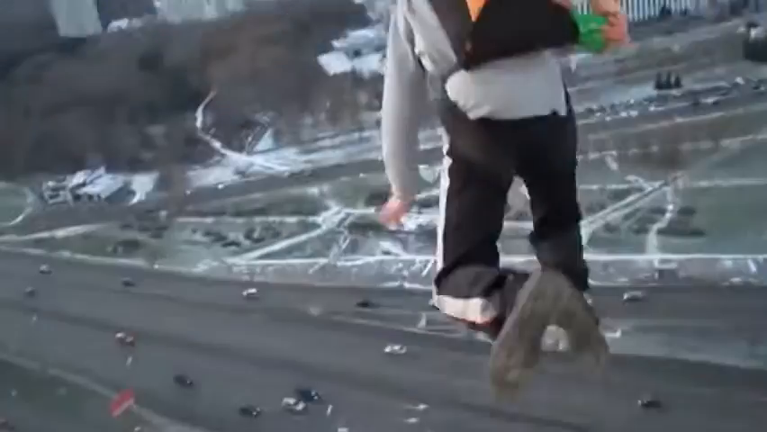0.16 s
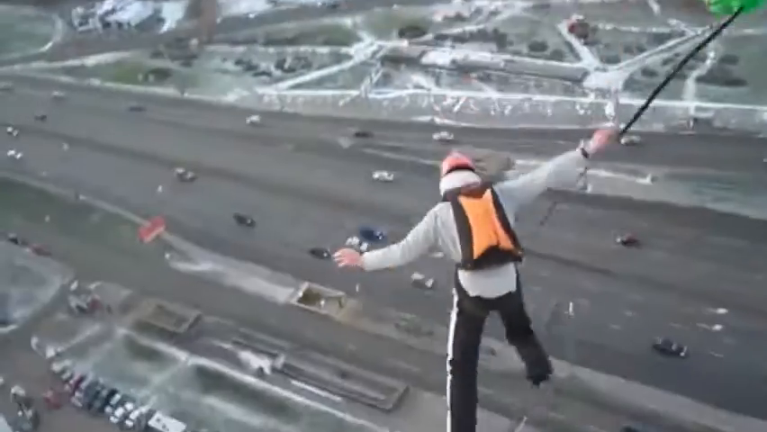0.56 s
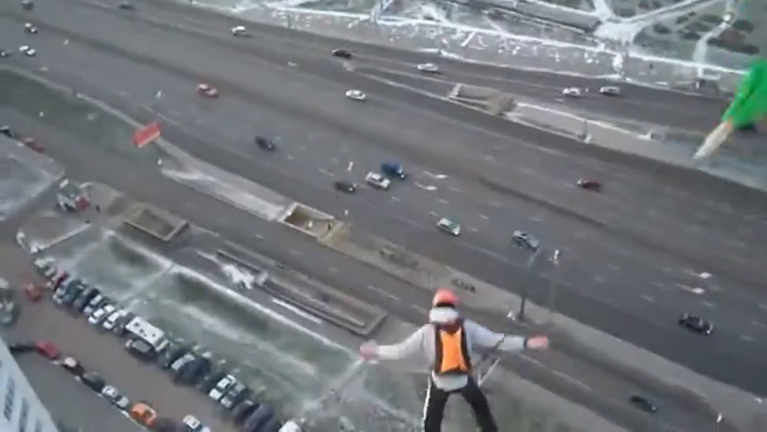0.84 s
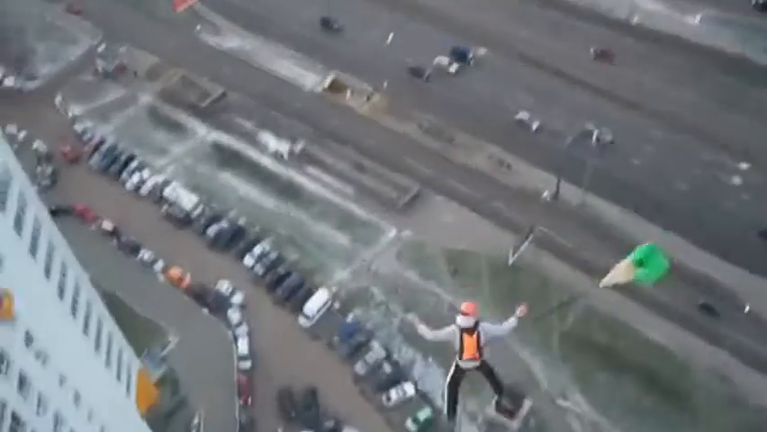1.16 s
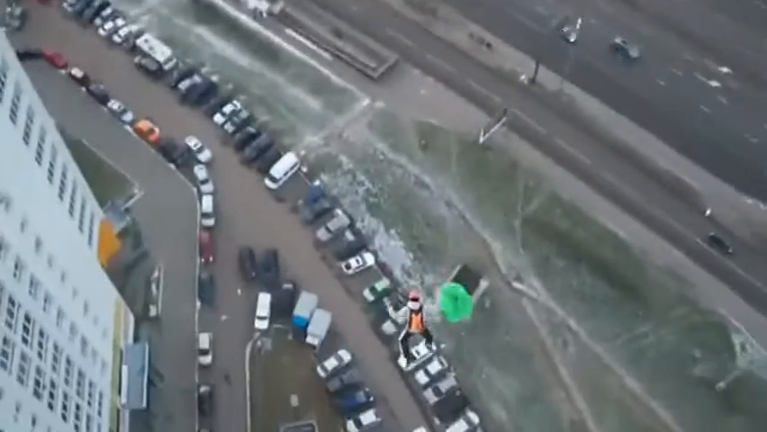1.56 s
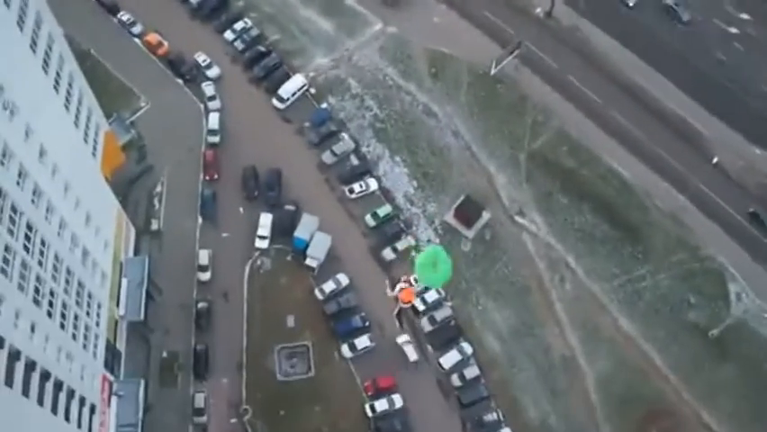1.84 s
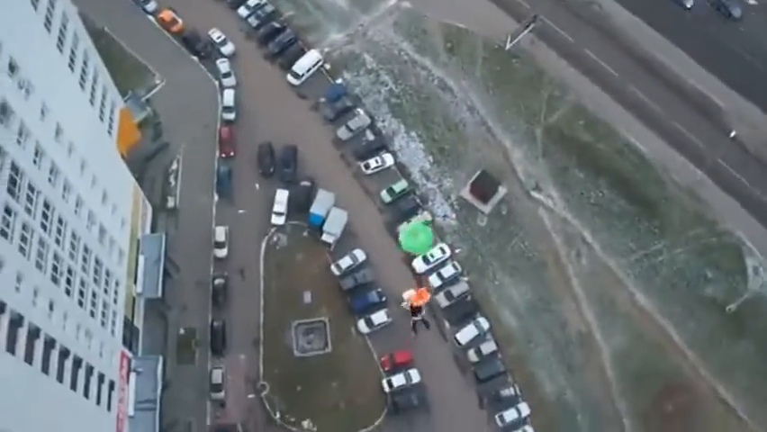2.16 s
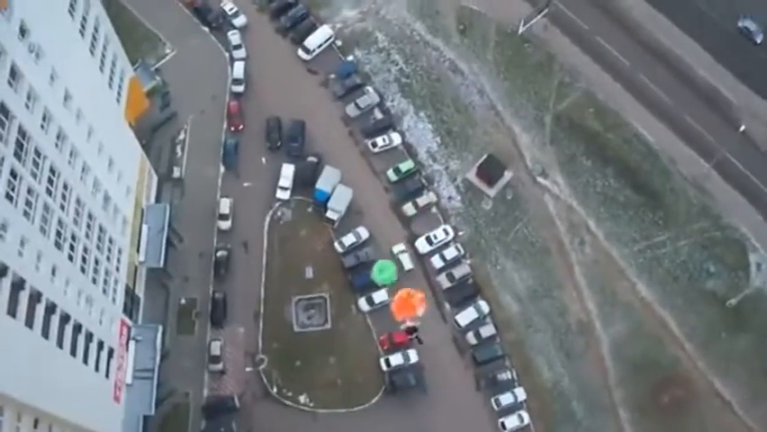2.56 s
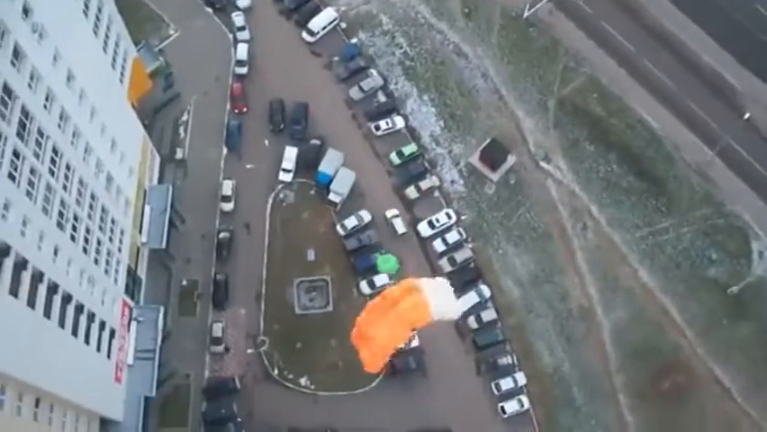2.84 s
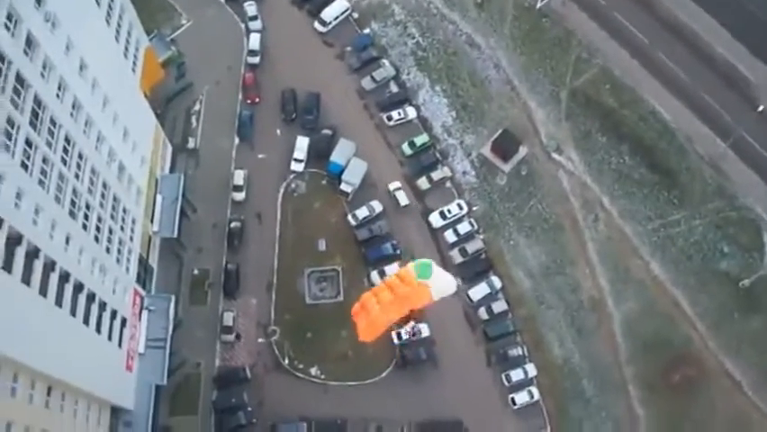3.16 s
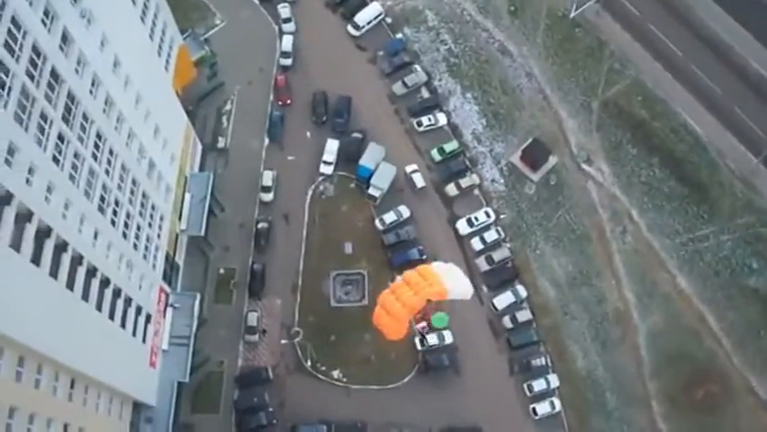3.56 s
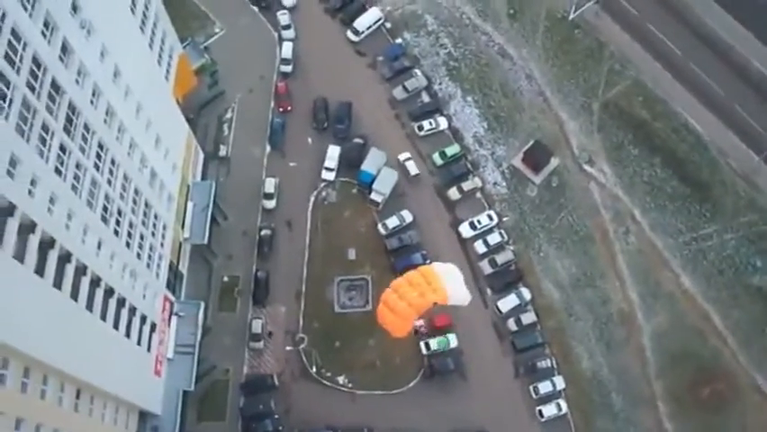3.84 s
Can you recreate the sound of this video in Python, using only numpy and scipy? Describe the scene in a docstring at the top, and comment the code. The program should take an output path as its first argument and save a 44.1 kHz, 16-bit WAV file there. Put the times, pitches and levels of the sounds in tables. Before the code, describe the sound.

Heard from high on a tower, a nylon parachute cracks open and flutters below, after a few rigging clicks, cloth swishes and a gust on the microphone. Distant traffic and low wind run underneath.

```python
"""Metal rigging clicks and cloth rustles over the roar of a motorway, far below a high tower.
Wind rumbles on the microphone as a parachutist jumps; cord zips over cloth and one gust thumps.
Far below, the nylon canopy crackles, snaps and booms as it fills with air.
It flutters once more, duller, and the sound fades out."""
import sys
import numpy as np
from scipy import signal
from scipy.fft import rfft, irfft, next_fast_len
from scipy.io import wavfile
from scipy.ndimage import uniform_filter1d, map_coordinates

SR = 44100
rng = np.random.default_rng(int(sys.argv[2]) if len(sys.argv) > 2 else 0)


def master_out(mix):
    """Clip the mix to full scale and print it as 16-bit PCM to the path in sys.argv[1]."""
    frames = np.transpose(np.atleast_2d(mix))
    ceiling = np.clip(frames, -1, 1)
    pcm = np.round(ceiling * 32767).astype(np.int16)
    wavfile.write(sys.argv[1], SR, pcm)


N = 176400


def amp(db):
    """Decibels to gain."""
    return 10 ** (np.asarray(db) / 20)


def unit(x):
    """Scale to rms 1."""
    return x / np.sqrt(np.mean(x ** 2) + 1e-20)


def clock():
    """The time of each sample in seconds."""
    return np.arange(N) / SR


def curve(rows):
    """An envelope: (t/s, value) points joined by straight lines."""
    return np.interp(clock(), *np.transpose(rows))


def bell(s, width_s):
    """A smooth bump centred on time s."""
    return np.exp(-.5 * ((clock() - s) / width_s) ** 2)


def wobble(rate):
    """Smooth random modulation, rate knots a second."""
    return map_coordinates(rng.standard_normal(4096), [clock() * rate + 2], mode="wrap")


def eq(x, points):
    """Filter x through (f/Hz, level/dB) points on a log frequency axis."""
    size = next_fast_len(len(x) + 8192)
    hz, db = np.transpose(points)
    gain = amp(np.interp(np.log(np.fft.rfftfreq(size, 1 / SR) + 1), np.log(hz + 1), db))
    return irfft(rfft(x, size) * gain, size)[:len(x)]


def rush(spectrum, patchy_db):
    """Noise of rms 1 whose level drifts in patches of time and frequency."""
    bins = signal.stft(rng.standard_normal(N), nperseg=512)[2]
    patches = uniform_filter1d(rng.standard_normal(bins.shape), size=5, axis=0)
    patches = uniform_filter1d(patches, size=12, axis=1)
    noise = signal.istft(bins * amp(patchy_db * unit(patches)), nperseg=512)[1][:N]
    return unit(eq(noise, spectrum))


def crinkle(spectrum, rate, scatter_db, pop_share):
    """Fabric noise of rms 1: tiny creases popping at random, over a smooth hiss."""
    pops = (rng.random(N) < rate / SR) * np.sign(rng.standard_normal(N))
    pops *= amp(scatter_db * (2 * rng.random(N) - 1))
    hiss = rng.standard_normal(N)
    return unit(eq(np.sqrt(pop_share) * unit(pops) + np.sqrt(1 - pop_share) * hiss, spectrum))


def fuzzy_tone(phase, width_hz):
    """A narrow noise band of rms 1 around a running phase."""
    return unit(wobble(width_hz) * np.cos(phase) + wobble(width_hz) * np.sin(phase))


def add(track, s, sound):
    """Mix a sound in at time s."""
    part = track[round(s * SR):][:len(sound)]
    part += sound[:len(part)]


# Traffic bed envelope: t/s, level/dB
TRAFFIC_ENV = [(0, -27.5), (.19, -30), (.29, -23), (.75, -22), (1.2, -22.5), (1.7, -21.5), (2.0, -21.5),
               (2.16, -23), (2.42, -22), (2.75, -22.5), (2.95, -27.5), (3.05, -31), (3.2, -24), (3.4, -23),
               (3.75, -23)]
# Tone of the tyre roar: f/Hz, level/dB
TRAFFIC_EQ = [(30, -13), (120, -7.5), (210, -1.5), (320, -4), (450, -2.5), (620, -1), (760, 1), (880, 1),
              (1030, -0.5), (1200, -3), (1600, -7.5), (2000, -14.5), (2600, -22.5), (3500, -27),
              (5000, -34.5), (6500, -39.5), (10000, -44), (14000, -45)]

def traffic():
    """The tyres of many distant cars merge into one roar."""
    return amp(curve(TRAFFIC_ENV) + 0.56 * wobble(14)) * rush(TRAFFIC_EQ, patchy_db=1.0)


# Wind envelope: t/s, level/dB
WIND_ENV = [(0, -29.5), (.6, -25.5), (1.2, -29), (2.0, -24), (2.4, -25), (2.65, -21), (2.9, -26),
            (3.0, -21), (3.15, -24), (3.28, -20), (3.38, -27), (3.6, -19.5), (3.75, -14)]
# Bass-heavy tone of the wind: f/Hz, level/dB
WIND_EQ = [(8, 1.5), (25, 0), (50, -3), (90, -2.5), (160, -7.5), (300, -17.5), (700, -34), (2000, -71)]

def wind():
    """Air flowing over the microphone makes a lumpy rumble."""
    return amp(curve(WIND_ENV) + 1.4 * wobble(21.88)) * rush(WIND_EQ, patchy_db=1.5)


# Eddy thumps: t/s, peak level/dB, half width/s, direction (+1 push, -1 suction)
EDDIES = [(2.211, -10.5, 0.0039, 1), (2.222, -5.5, 0.0022, 1), (2.229, -21, 0.0045, -1),
          (2.246, -6.5, 0.0027, 1), (2.265, -5, 0.0043, -1), (2.279, -13.5, 0.0049, -1),
          (2.598, -17, 0.0035, -1), (2.647, -11, .0015, 1), (3.243, -11.5, 0.0032, 1),
          (3.252, -15, .002, -1), (3.266, -12, 0.0019, 1), (3.274, -14, .003, -1), (3.314, -11, 0.002, -1),
          (3.729, 2, 0.00104, 1)]
# Low body of the puff: f/Hz, level/dB
PUFF_EQ = [(20, 3.5), (90, 7.5), (250, -4), (500, -16), (1500, -57.5)]

def gust():
    """Eddies push and pull at the microphone, several bunched inside one puff of turbulence."""
    pushes = sum(np.sign(way) * amp(db) * bell(s, width) for s, db, width, way in EDDIES)
    puff = unit(eq(rng.standard_normal(N), PUFF_EQ))
    return pushes + amp(-14.5) * bell(2.23, width_s=.025) * puff


# Rustle envelope: t/s, level/dB
CLOTH_ENV = [(0, -35), (.09, -44), (.22, -44.5), (.39, -41.5), (.54, -41.5), (.7, -49.5), (.92, -43),
             (.97, -47.5), (1.34, -47), (1.72, -50.5), (1.81, -40), (1.88, -55.5), (2.45, -64)]
# Bright tone of rubbing cloth: f/Hz, level/dB
CLOTH_EQ = [(800, -26), (2000, 3.5), (3000, -1.5), (5200, -2), (6500, -9), (9000, -10.5), (10800, -10.5),
            (14000, -24)]

def clothes():
    """Cloth rubs in soft swishes."""
    return amp(curve(CLOTH_ENV) + 2.6 * wobble(40)) * rush(CLOTH_EQ, patchy_db=2.0)


# Cord slides: centre t/s, half width/s, f/Hz, glide/(Hz/s), level/dB
CORD_SLIDES = [(.395, 0.026, 5530, 0, -45.5), (.458, 0.012, 4300, 24000, -46),
               (.525, 0.02, 5250, -3000, -45), (1.805, 0.037, 5030, 2996, -45.5)]

def cord_zips(width_hz=450, octave_db=-10):
    """A cord runs over woven cloth; the pitch follows its speed."""
    out = np.zeros(N)
    for s, width, hz, glide, db in CORD_SLIDES:
        t = clock() - s
        phase = 2 * np.pi * (hz * t + glide * t ** 2 / 2)
        tone = fuzzy_tone(phase, width_hz)
        octave = amp(octave_db) * fuzzy_tone(2 * phase, 2 * width_hz)
        out += amp(db) * bell(s, width) * (tone + octave)
    return out


# Hardware hits: t/s, level/dB, tilt/(dB/octave), ring level/dB
METAL_HITS = [(0.11, -14, -7, 0), (0.1136, -7, 0, 1), (0.122, -22.5, -3.5, -3), (.128, -24.5, -1, -6),
              (0.166, -18.5, -2, -5.5), (.171, -19, 0, -8), (0.301, -13, 0, -7), (.558, -23.5, 5, -10),
              (1.823, -19.5, -1.5, -5)]
# Ringing modes of the metal: f/Hz, level/dB, T60/s
METAL_MODES = [(2588, 1, 0.022), (2460, -12, .03), (2554, -17, 0.093), (2944, -25, .07), (4240, -28, .1),
               (5740, -23, .06), (6180, -11, .022), (6420, -13.5, .02), (9730, -13.5, 0.0196),
               (10220, -26, .05), (13420, -21, .022)]

def rigging_clicks(attack_s=0.00061, scrape_db=-14.5, scrape_t60=0.033):
    """A small metal part knocks, rings and scrapes; each contact has its own brightness."""
    out, t = np.zeros(N), np.arange(SR // 6) / SR
    main_hz = METAL_MODES[0][0]
    for s, db, tilt_db, ring_db in METAL_HITS:
        ring = np.zeros(len(t))
        for hz, level, t60 in METAL_MODES:
            mode_db = level + tilt_db * np.log2(hz / main_hz) + rng.normal(0, 1)
            ring += amp(mode_db - 60 * t / t60) * np.sin(2 * np.pi * hz * t + rng.normal(0, 0.63))
        noise = unit(eq(rng.standard_normal(len(t)), CLOTH_EQ))
        scrape = amp(scrape_db + tilt_db - 60 * t / scrape_t60) * noise
        attack = 1 - np.exp(-t / attack_s)
        add(out, s, amp(db) * attack * (amp(ring_db) * ring + scrape))
    return out


# Fabric and line cracks: t/s, level/dB, tilt/(dB/octave)
SNAP_HITS = [(0.359, -12, -2.5), (1.1395, -18, -0.5), (1.796, -25, 0), (1.822, -25, -4), (2.549, -8, -14.5),
             (2.62, -17.5, -5), (2.642, -16, -4.5), (2.701, -11, -1.5), (2.781, -8.5, 1), (2.801, -4, 0),
             (2.8115, -5.5, -4), (2.8559, -3, -22.5), (2.8735, -8, 2), (2.9127, -3.5, 1.5),
             (2.921, -3, -2.5), (2.935, -10, -1.5), (2.946, -5.5, 0), (2.97, -11, -3.5),
             (3.12, -17.5, -3.5), (3.397, -22, -3), (3.433, -15, -6.5)]
# Crisp tone of nylon, for the snaps and the canopy's crackle: f/Hz, level/dB
NYLON_EQ = [(1000, -21.5), (2600, -8), (3600, -2), (4700, 3), (5700, -1), (6700, -10.5), (9000, -16.5),
            (10400, -6), (11700, -9), (13200, -27.5), (14200, -24)]

def snaps(attack_s=.0004, t60=0.016, pivot_hz=4500, trim_db=-7):
    """Fabric and lines jerk tight in short cracks; slack cloth is duller."""
    out, t = np.zeros(N), np.arange(2048) / SR
    attack = 1 - np.exp(-t / attack_s)
    for s, db, tilt_db in SNAP_HITS:
        colour = [(hz, level + tilt_db * np.log2(hz / pivot_hz)) for hz, level in NYLON_EQ]
        noise = unit(eq(rng.standard_normal(len(t)), colour))
        add(out, s, amp(db + trim_db - 60 * t / t60) * attack * noise)
    return out


# Crackle envelope of the opening canopy: t/s, level/dB
CRACKLE_ENV = [(2.48, -59), (2.555, -38), (2.6, -44), (2.65, -35.5), (2.69, -43.5), (2.75, -31.5),
               (2.805, -21), (2.85, -24), (2.89, -29.5), (2.925, -24.5), (2.98, -33.5), (3.04, -40.5),
               (3.13, -40.5), (3.2, -57.5)]
# Flap envelope: t/s, level/dB
FLAP_ENV = [(2.45, -39.5), (2.64, -28), (2.74, -26.5), (2.805, -15.5), (2.855, -20), (2.89, -25),
            (2.94, -17.5), (3.02, -33), (3.1, -41)]
# Full-bodied tone of the flapping: f/Hz, level/dB
FLAP_EQ = [(50, -9), (150, -3), (280, 3), (600, -0.5), (1100, -7.5), (1700, 0), (2100, -8.5), (2600, -19),
           (4000, -14.5), (7000, -44.5), (14000, -53.5)]
# Swell of the closing flutter: t/s, level/dB
FLUTTER_ENV = [(3.02, -49), (3.1, -30), (3.19, -23), (3.23, -23), (3.28, -20), (3.35, -29.5), (3.5, -36.5),
               (3.65, -43)]
# Duller tone of that flutter: f/Hz, level/dB
FLUTTER_EQ = [(100, -5.5), (300, 1.5), (650, 3), (1100, -2), (1600, 4), (2100, -5.5), (2600, -10.5),
              (4000, -12), (5500, -18), (7000, -34), (9000, -35.5), (11300, -24), (14000, -34)]
# Low booms as the cells fill: t/s, half width/s, level/dB
BOOMS = [(2.808, .009, -25), (2.858, 0.012, -21.5), (2.942, .014, -22)]

def canopy(boom_hz=290):
    """Nylon crackles, flaps and booms as it fills; a duller flutter follows."""
    shake = wobble(90)  # one tremor moves all three fabric layers
    crackle = crinkle(NYLON_EQ, rate=1400, scatter_db=8, pop_share=.55)
    crackle *= amp(curve(CRACKLE_ENV) + 1.26 * shake)
    flap = crinkle(FLAP_EQ, rate=900, scatter_db=3.5, pop_share=0.22)
    flap *= amp(curve(FLAP_ENV) + 1.5 * shake)
    boom = fuzzy_tone(2 * np.pi * boom_hz * clock(), width_hz=130)
    boom *= sum(amp(db) * bell(s, width) for s, width, db in BOOMS)
    flutter = crinkle(FLUTTER_EQ, rate=1200, scatter_db=8.5, pop_share=.3)
    flutter *= amp(curve(FLUTTER_ENV) + 0.92 * shake)
    return crackle + flap + boom + flutter


def scene():
    """A mono mix of the jump over a bed of traffic, wind and cloth."""
    dip = amp(-4 * bell(2.295, width_s=0.027))  # the bed dips briefly just after the puff
    bed = (traffic() + wind() + clothes()) * dip
    return (bed + gust() + cord_zips() + canopy() + snaps() + rigging_clicks())[None]


# Master EQ, a deep notch around 8 kHz: f/Hz, level/dB
NOTCH_EQ = [(6600, 1), (7300, -10.5), (7700, -31.5), (8000, -50), (8250, -42.5), (8600, -14.5), (9300, -2)]
CEILING, TOP_HZ = .88, 14300
FADE_START_S, FADE_END_S, FADE_POWER = 3.389, 3.819, 1.19

def record(dry):
    """Master chain: soft clip, fade-out, treble notch and brick-wall low-pass."""
    rounded = dry[0] / (1 + (dry[0] / CEILING) ** 8) ** (1 / 8)
    fade = np.clip((FADE_END_S - clock()) / (FADE_END_S - FADE_START_S), 0, 1) ** FADE_POWER
    notched = eq(rounded * fade, NOTCH_EQ)
    size = next_fast_len(N + 8192)
    passband = np.fft.rfftfreq(size, 1 / SR) < TOP_HZ
    return irfft(rfft(notched, size) * passband, size)[None, :N]


dry = scene()
out = record(dry)
master_out(out)
```